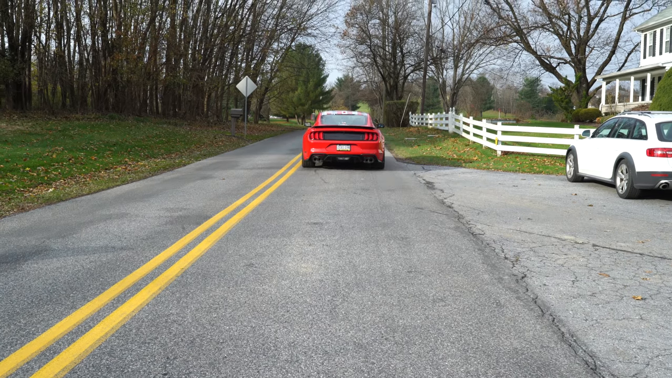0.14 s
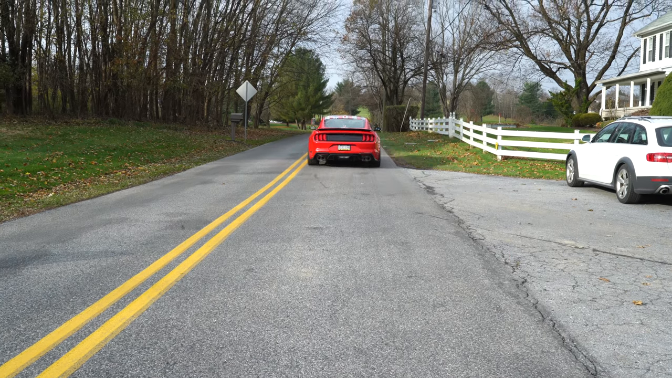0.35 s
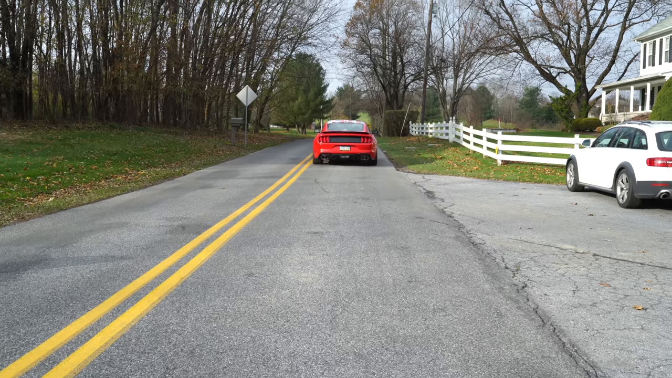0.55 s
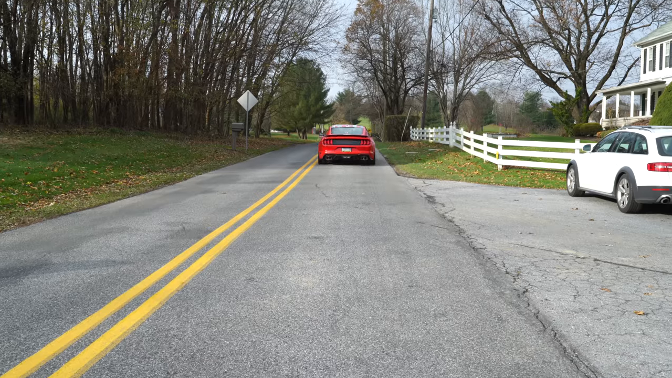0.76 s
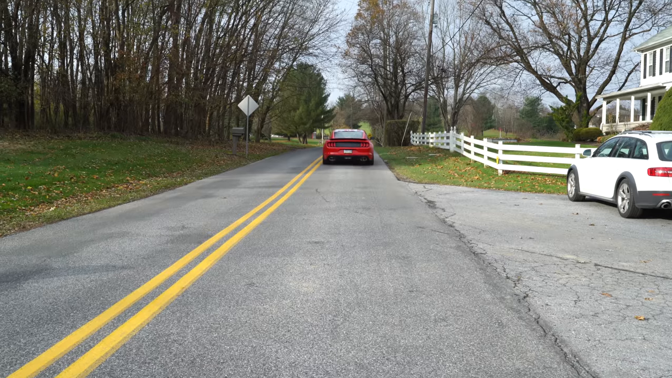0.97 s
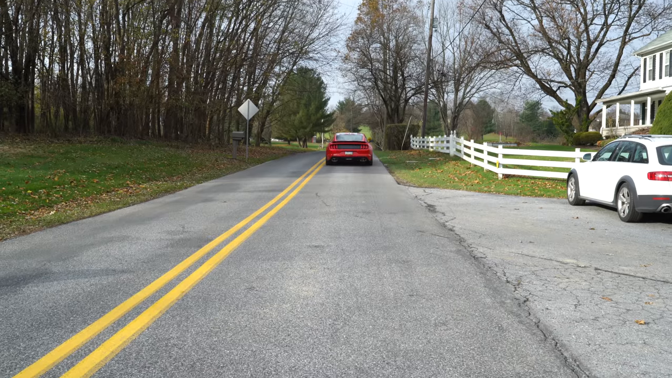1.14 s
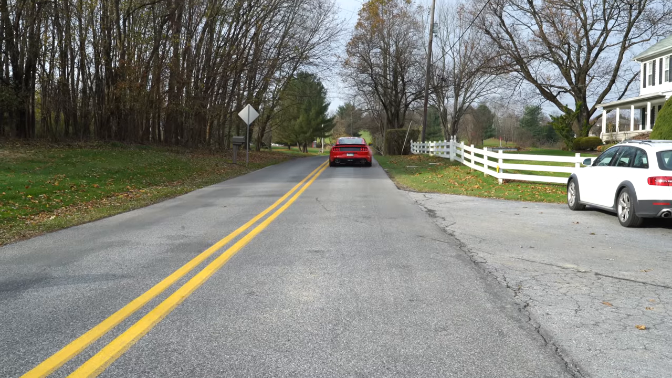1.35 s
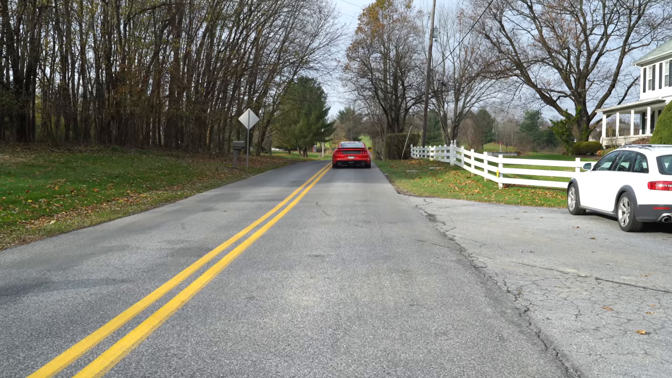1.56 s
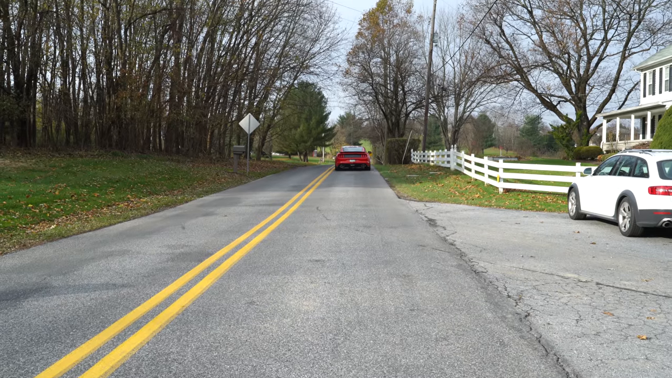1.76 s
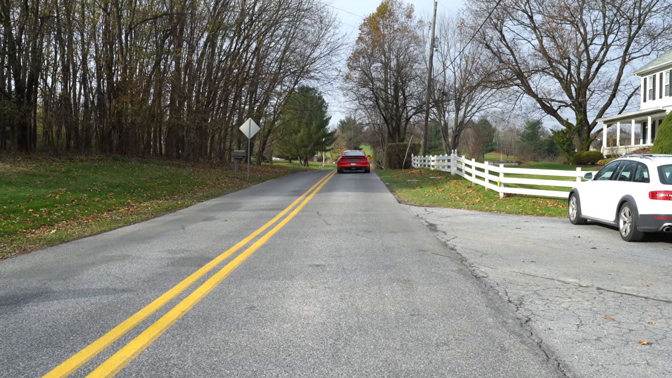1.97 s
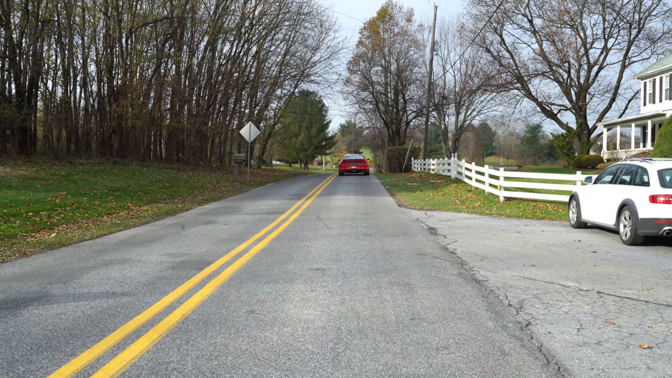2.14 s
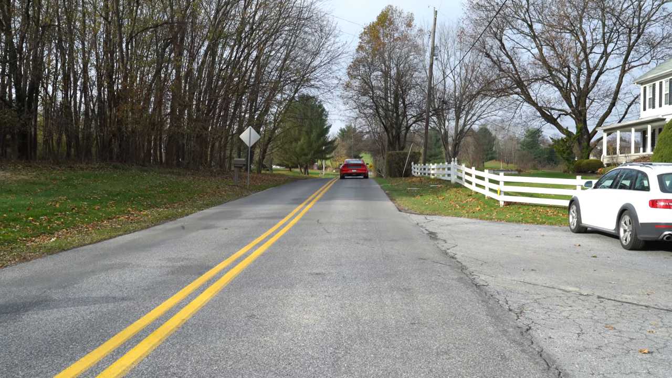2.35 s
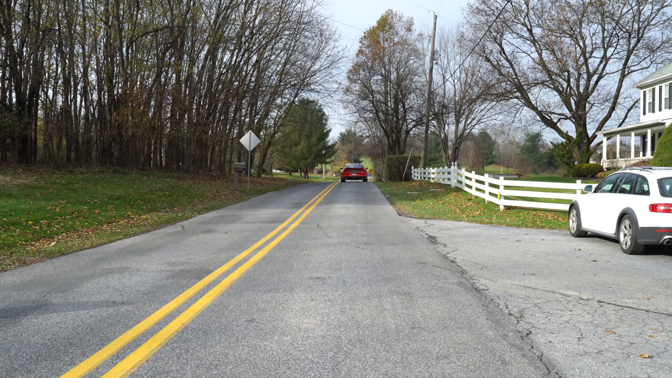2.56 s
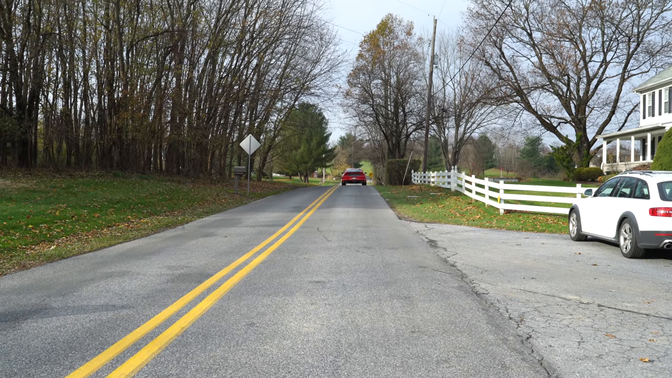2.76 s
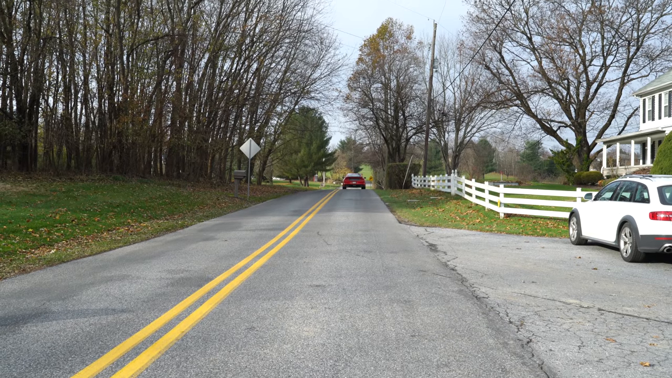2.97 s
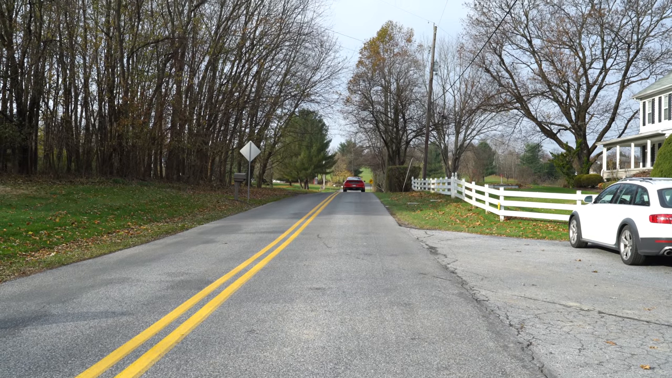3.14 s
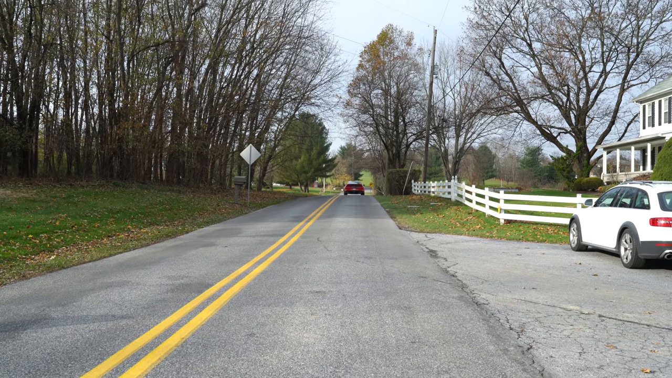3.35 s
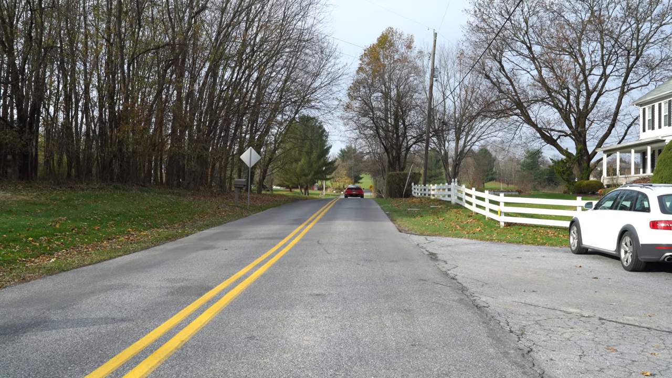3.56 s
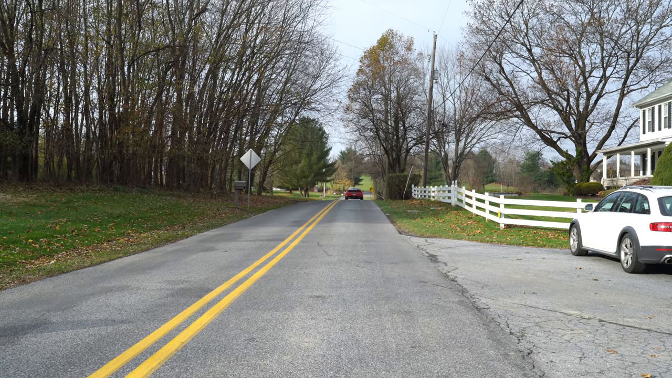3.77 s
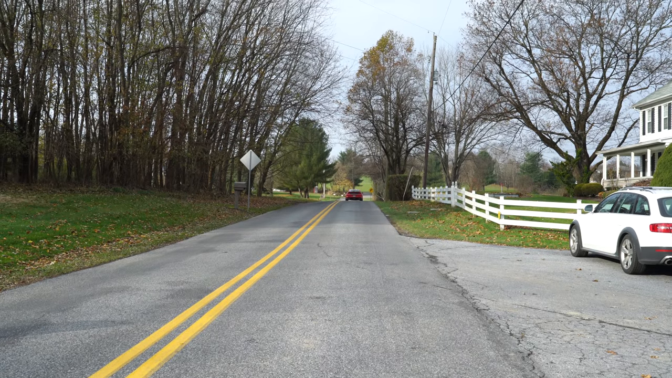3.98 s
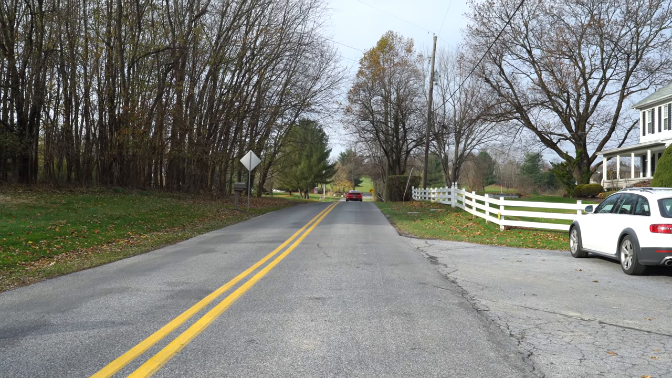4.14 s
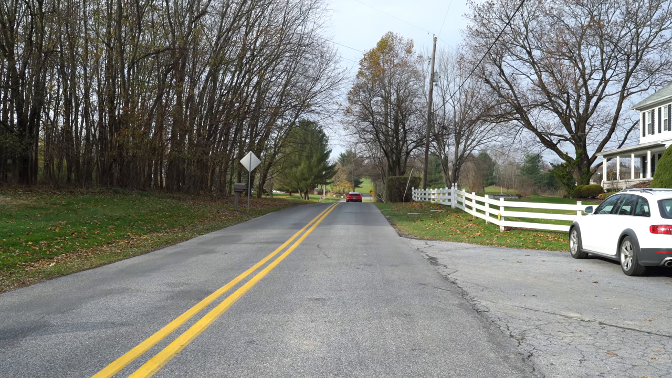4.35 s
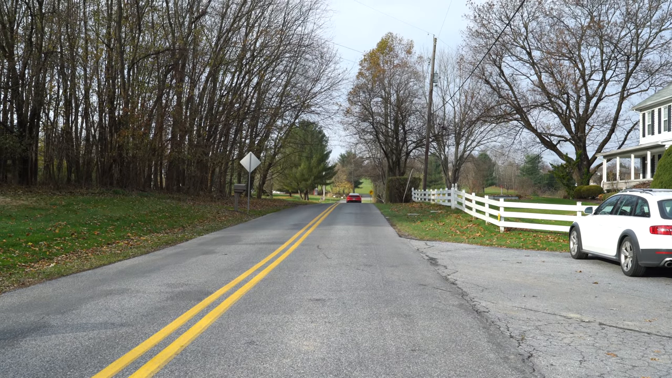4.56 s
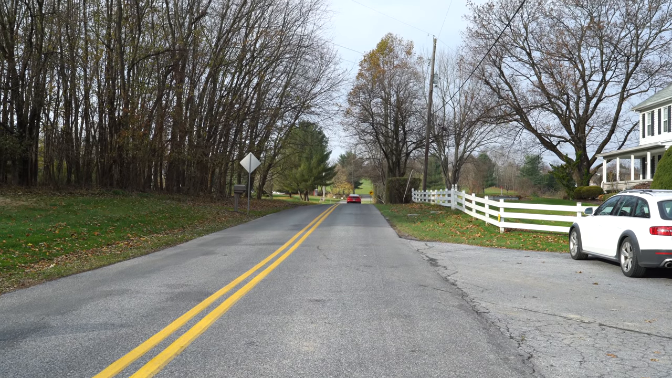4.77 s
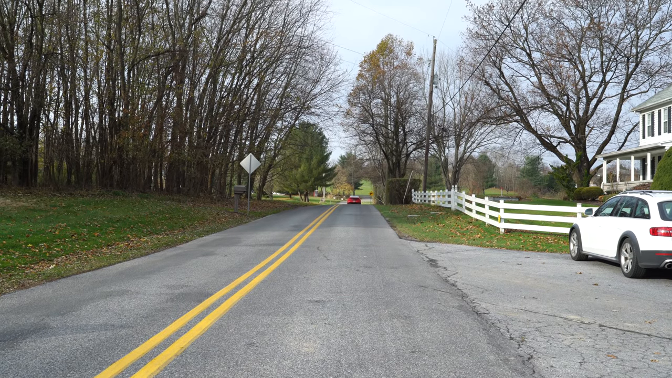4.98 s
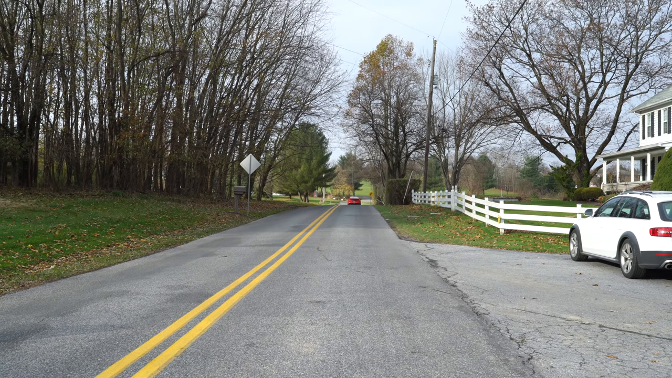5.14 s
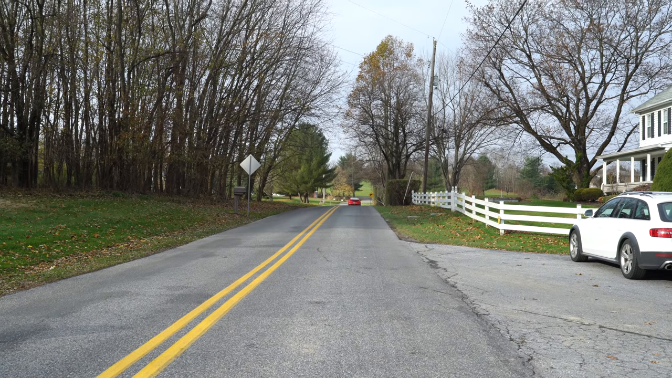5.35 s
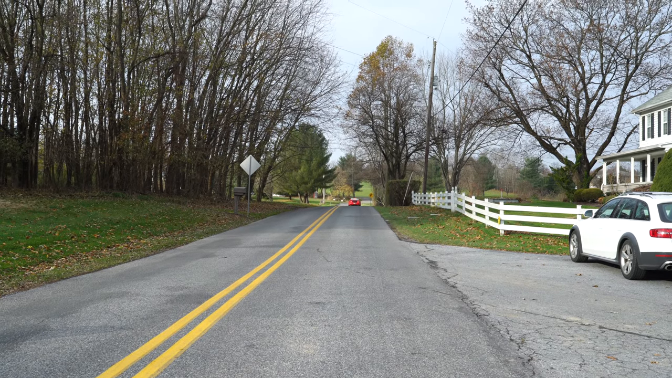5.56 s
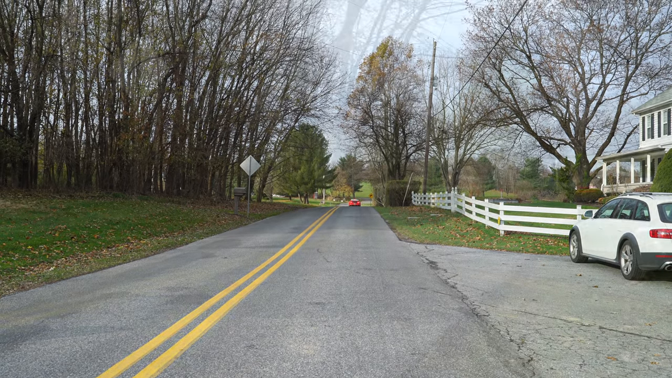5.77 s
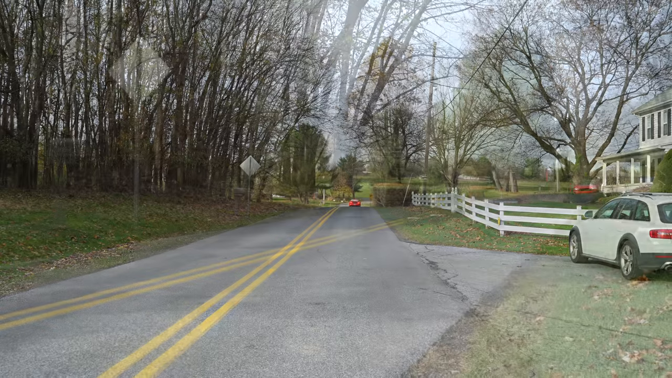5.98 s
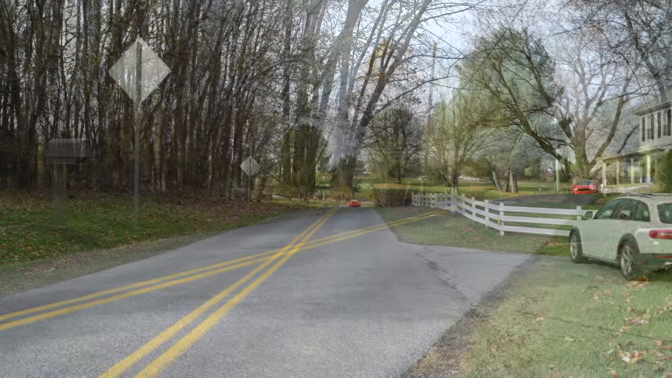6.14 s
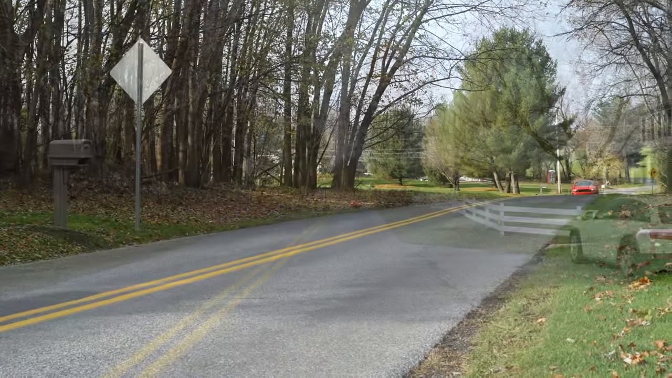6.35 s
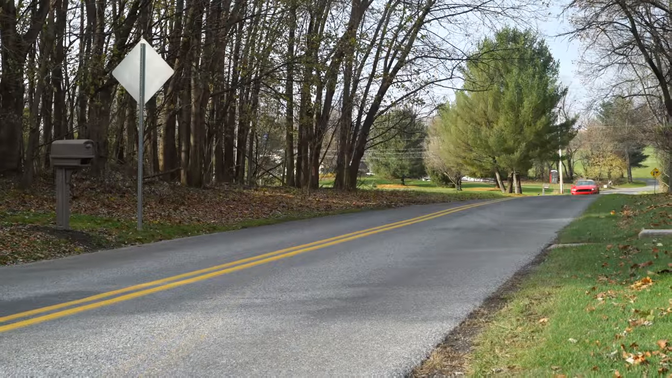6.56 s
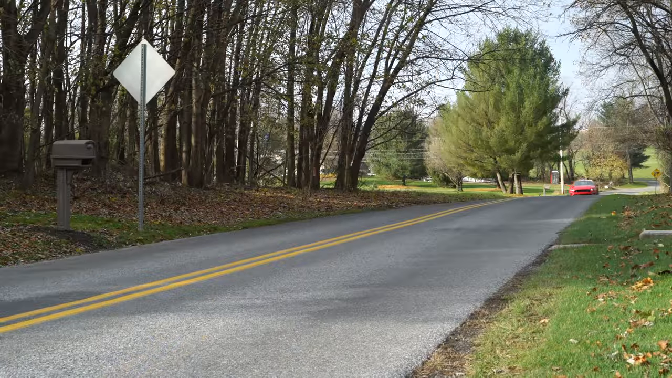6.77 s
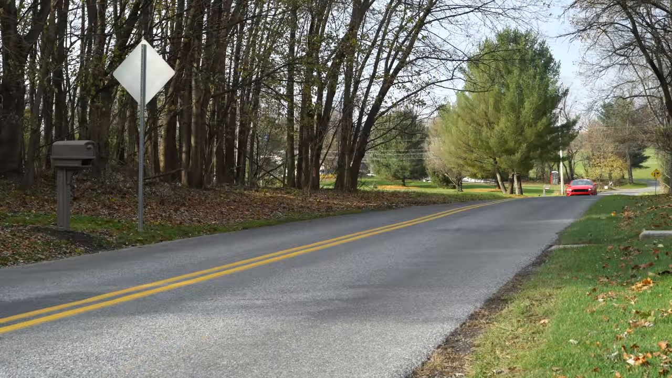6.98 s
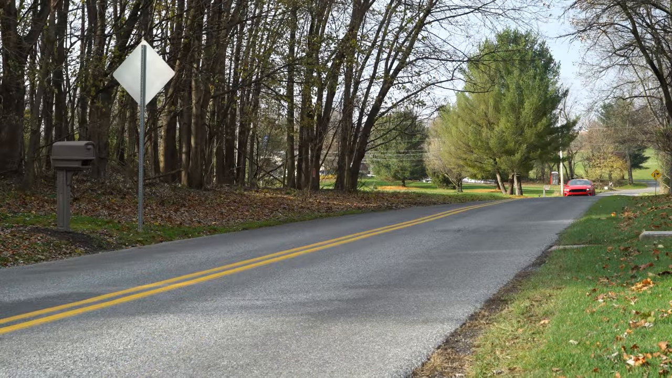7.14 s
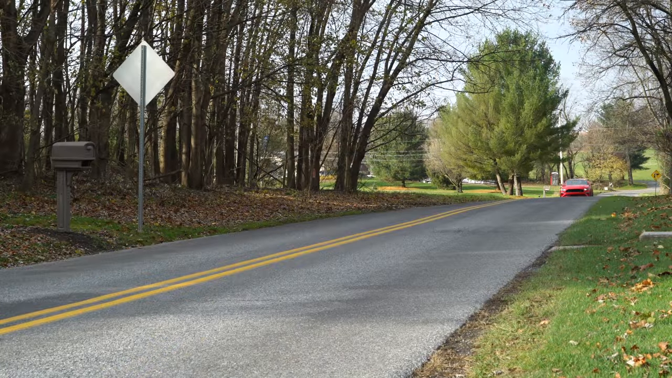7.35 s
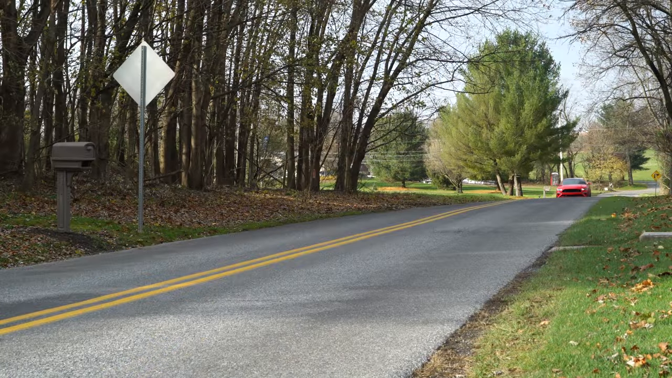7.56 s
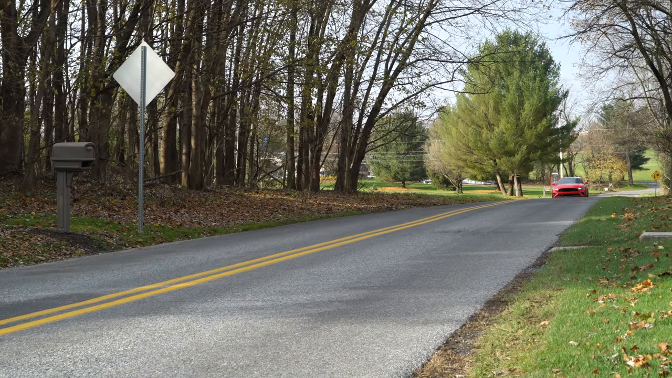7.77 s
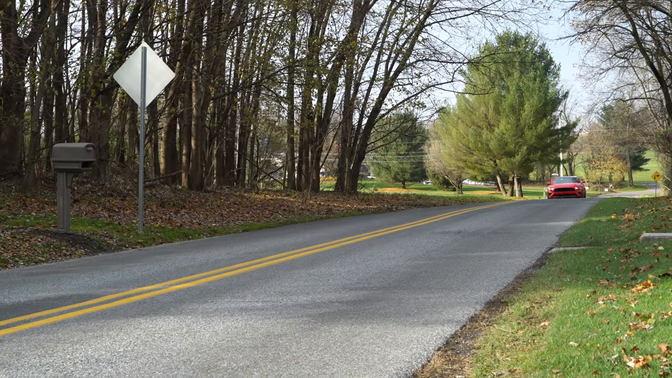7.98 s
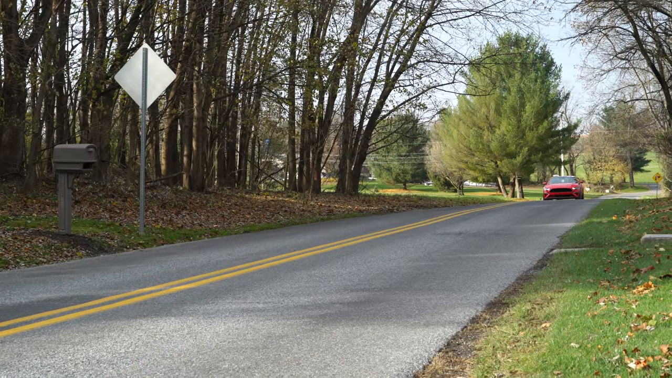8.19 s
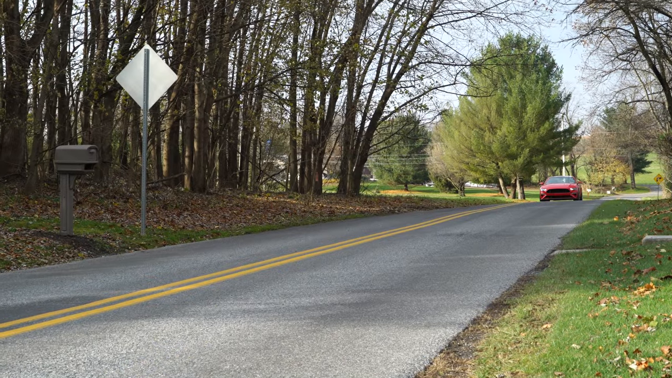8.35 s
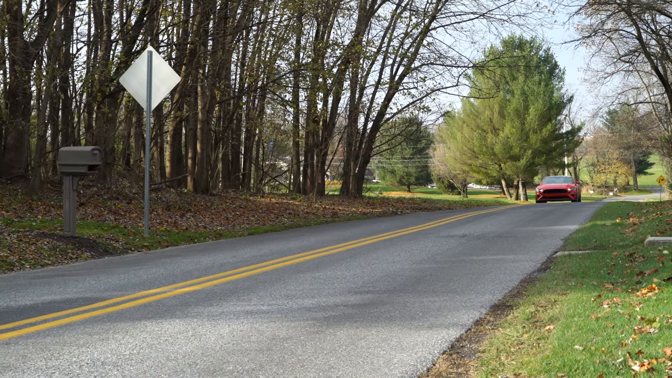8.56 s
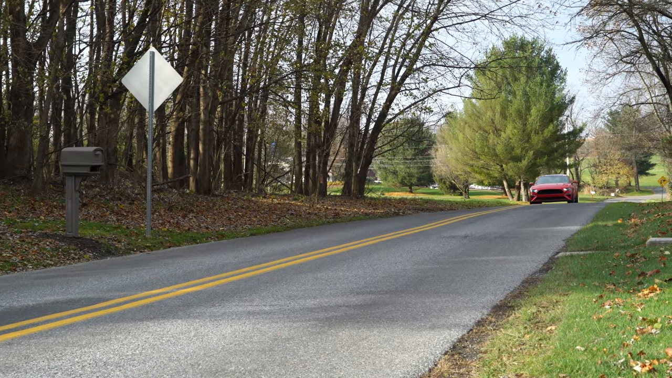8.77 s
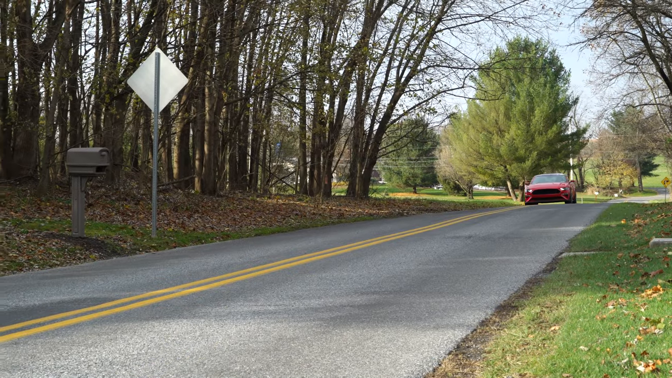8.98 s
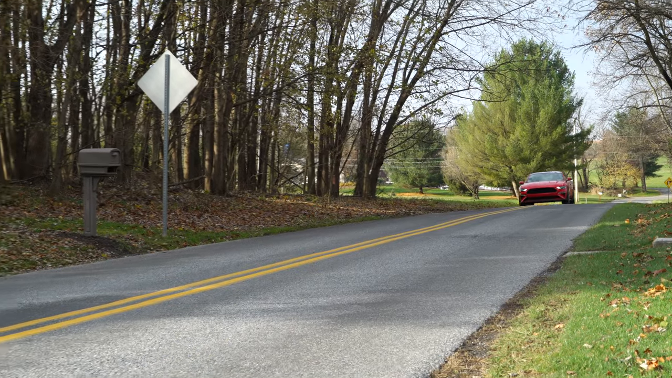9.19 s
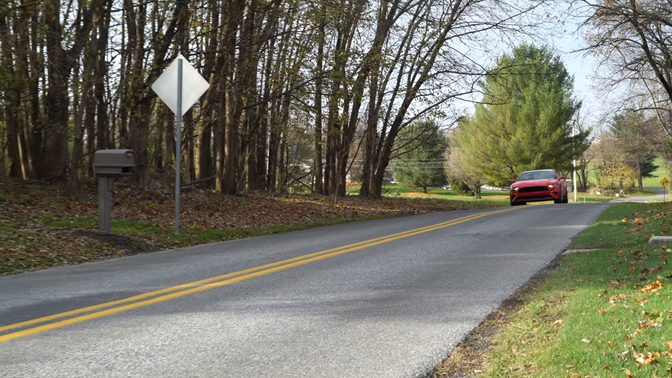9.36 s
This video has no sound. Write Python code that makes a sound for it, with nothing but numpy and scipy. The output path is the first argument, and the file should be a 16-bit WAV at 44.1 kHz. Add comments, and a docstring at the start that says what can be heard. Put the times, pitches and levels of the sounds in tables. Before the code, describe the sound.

A V8 sports car accelerates away from a fixed roadside microphone, loud enough to flatten the peaks at first. Two raspy pulls are split by a short popping lift; then come backfires, lumpy burble and a thin receding hum. Trees and fence return faint echoes. After a crossfade the car comes nearer, droning with rising pitch, low rumble and brightening tyre hiss over quiet country air and tiny squeaks.

```python
"""Country road by woods: a V8 car pulls hard away, shifts, pulls again, lifts off with pops and burble, cruises.
From about 6 s the car is heard from the front, droning closer with growing tyre noise.
Firing pulses drive the exhaust: filtered for boom and bark, steepened into shock fronts for rasp.
Pops are spikes and short noise bursts; rumble, tyres and air are coloured noise; squeaks are sines.
Roadside reflections and a scattered echo answer; the microphone flattens loud peaks."""
import sys
import numpy as np
from scipy import signal
from scipy.fft import rfft, irfft, next_fast_len
from scipy.io import wavfile
from scipy.ndimage import uniform_filter1d, map_coordinates

SR = 44100
rng = np.random.default_rng(int(sys.argv[2]) if len(sys.argv) > 2 else 0)


def unload_audio(sound):
    """Save the sound as a 16-bit wav file, at the path given as the first command line argument."""
    columns = np.transpose(np.atleast_2d(sound))
    # keep every value between -1 and 1, then stretch to whole-number steps
    steps = np.round(np.clip(columns, -1, 1) * 32767)
    wavfile.write(sys.argv[1], SR, steps.astype(np.int16))


N = 415422
TIME = np.arange(N) / SR

# relative colour of the exhaust's shock fronts and hiss: freq_hz, gain_db
RASP_COLOUR = [(1120, 8.5), (1900, -2.5), (2250, -17), (2700, -10.5), (3100, -15), (3600, -13), (4200, -19),
               (5100, -21.5), (5980, -27), (6710, -27), (15600, -41.5)]


def amp(db):
    """Decibels to gain."""
    return 10 ** (np.asarray(db) / 20)


def unit(x):
    """Scale to rms 1."""
    return x / np.sqrt(np.mean(x ** 2) + 1e-20)


def steady(x):
    """Hold the running rms near 1."""
    power = uniform_filter1d(uniform_filter1d(x * x, size=5000), size=3000)
    return x / np.sqrt(np.abs(power) + 1e-14)


def along(points, hz):
    """(Hz, value) points read on a log frequency axis."""
    point_hz, values = np.transpose(points)
    return np.interp(np.log(hz + 1), np.log(point_hz + 1), values)


def curves(rows):
    """One value per sample for each column after the time."""
    time_s, *columns = np.transpose(rows)
    return [np.interp(TIME, time_s, column) for column in columns]


def wobble(knots_per_s):
    """Smooth random curve through normally distributed knots."""
    knots = rng.standard_normal(int(N * knots_per_s / SR) + 4)
    coarse_s = TIME[::16]
    return np.interp(TIME, coarse_s, map_coordinates(knots, [coarse_s * knots_per_s]))


def ramp(start_s, end_s):
    """Rise from 0 to 1 between two times."""
    return np.clip((TIME - start_s) / (end_s - start_s), 0, 1)


def bump_at(centre_s, half_length_s):
    """Gaussian hump of height 1, down to 1/e at the half length."""
    return np.exp(-((TIME - centre_s) / half_length_s) ** 2)


def dying(times_s, decay_s):
    """Jump by 1 at each time, then decay exponentially."""
    return sum((TIME > s) * np.exp(-np.abs(TIME - s) / decay_s) for s in times_s)


def coloured(x, points, size=8192):
    """Minimum-phase filter with the gain of the (Hz, dB) points, built by folding the cepstrum."""
    cepstrum = irfft(np.log(amp(along(points, np.fft.rfftfreq(size, 1 / SR)))))
    cepstrum[1:size // 2] *= 2
    cepstrum[size // 2 + 1:] = 0
    response = irfft(np.exp(rfft(cepstrum)))[:size // 2]
    return signal.oaconvolve(x, response)[:N]


def band(x, hz, kind, order=3):
    """Zero-phase Butterworth filter: the pulses stay in step."""
    return signal.sosfiltfilt(signal.butter(order, hz, kind, fs=SR, output="sos"), x)


def noise(points):
    """Coloured noise of rms 1."""
    return unit(coloured(rng.standard_normal(N), points))


def impulses(times_s, sizes):
    """Impulses placed between samples by linear sharing."""
    at = np.clip(times_s * SR, 0, N - 2)
    i = at.astype(int)
    early = np.bincount(i, sizes * (1 - at + i), N)
    late = np.bincount(i + 1, sizes * (at - i), N)
    return early + late


def puffs(kicks, decay_s):
    """Each impulse starts a decaying burst of turbulence; its energy does not depend on the decay time."""
    keep = np.exp(-1 / (decay_s * SR))
    envelope = signal.lfilter([np.sqrt(1 - keep ** 2)], [1, -keep], kicks)
    return envelope * rng.standard_normal(N)


def firings(cycles_per_s, cylinders, roughness):
    """Pulse times, edge sizes and both gas flows; unequal pipe runs give the V8 its lope."""
    jitter_ms, scatter_db, turbulence = roughness
    count = np.cumsum(cycles_per_s) / SR * len(cylinders)
    k = np.arange(1, int(count[-1]))
    size_db, late_ms, *edge_db = np.array(cylinders)[k % len(cylinders)].T
    timing_chance, size_chance = rng.standard_normal((len(k), 2)).T
    times_s = np.interp(k, count, TIME) + (late_ms + jitter_ms * timing_chance) / 1000
    sizes_db = np.array([size_db, edge_db[0] if edge_db else size_db])
    sizes, edges = amp(sizes_db + scatter_db * size_chance)
    kicks = [impulses(times_s, each) for each in (sizes, edges)]
    flows = [kick + turbulence * puffs(kick, decay_s=.083) for kick in kicks]
    return times_s, edges, flows


def tailpipe(effort, levels, cylinders, pipe, roughness, fronts):
    """Exhaust from behind: pulses boom, edges bark and steepen into rasp, each following revs and effort."""
    # engine speed, eight firings per cycle: time_s, cycles_per_s
    away_speed = [(0, 25.1), (.35, 29.4), (.6, 32.73), (.85, 35.86), (1.1, 38.93), (1.37, 41.5),
                  (1.45, 39.5), (1.6, 38.08), (1.75, 36.4), (1.9, 34.45), (2.07, 32.8), (2.27, 32.55),
                  (2.4, 31.17), (2.53, 28.9), (2.62, 30.1), (2.74, 31.75), (2.88, 31.55), (3.08, 33.1),
                  (3.3, 33.95), (3.45, 34.87), (3.72, 33.83), (3.85, 32.24), (4.3, 28.46), (4.55, 26.22),
                  (4.8, 22.5), (5, 23.25), (5.25, 22.92), (6.4, 21.85)]
    # a shock and its returns in the tailpipe: delay_ms, level_db
    shock_bounces = [(0, -4), (1.15, -13.5), (2.702, -11.5)]
    reference_cycles_per_s, flywheel_s = 33, .07
    throttle_powers = (.56, .78, 1.7)  # boom, bark, rasp: the treble follows effort most steeply
    boom_top_hz, bark_top_hz = 706, 1876
    rasp_top_hz, rasp_top_power = 4180, 2.5  # rasp above this needs a wide-open throttle
    jet_share = .38  # steady rush of gas relative to shock rms

    # the flywheel rounds every change of speed
    speed = uniform_filter1d(curves(away_speed)[0], size=round(flywheel_s * SR))
    octaves = np.log2(speed / reference_cycles_per_s)
    boom_gain, bark_gain, rasp_gain = [
        amp(level_db + slope_db * octaves) * effort ** power
        for (level_db, slope_db), power in zip(levels, throttle_powers)]
    times_s, edges, (flow, edge_flow) = firings(speed, cylinders, roughness)
    boom = band(coloured(flow, pipe), boom_top_hz, "low", order=4)
    bark = band(coloured(edge_flow, pipe), boom_top_hz, "high", order=4)
    bark = band(bark, bark_top_hz, "low", order=4)

    # each shock bounces back and forth in the tailpipe and trails a short hiss
    steepness, scatter_db, hiss_share = fronts
    heights = edges ** steepness * amp(scatter_db * rng.standard_normal(len(times_s)))
    shocks = sum(impulses(times_s + ms / 1000, heights * amp(db)) for ms, db in shock_bounces)
    jet = jet_share * np.std(shocks) * rng.standard_normal(N)
    hiss = hiss_share * puffs(impulses(times_s, heights), decay_s=.004)
    crackle = shocks + hiss + jet
    rasp = steady(band(coloured(crackle, RASP_COLOUR), bark_top_hz, "high", order=4))

    # air takes the top off the rasp as the car draws away
    near = bump_at(0, 1.83)
    rasp = near * rasp + (1 - near) * band(rasp, 5100, "low", order=1)
    dull = band(rasp, rasp_top_hz, "low", order=2)
    rasp = dull + np.minimum(effort, 1) ** rasp_top_power * (rasp - dull)
    return boom_gain * steady(boom) + bark_gain * steady(bark) + rasp_gain * rasp


def throttle(opens_s, rise_s, shuts_s, fall_s):
    """Effort of one pull, nominally 0-1: builds, holds with brief eases or surges, dies away."""
    # momentary changes: centre_s, half_length_s, change_db
    eases = [(1.073, 0.12, -0.5), (2.553, 0.056, -1.5), (3.535, .06, 1)]
    attack = (1 - np.exp(-np.maximum(TIME - opens_s, 0) / rise_s)) ** 2
    release = np.exp(-(np.maximum(TIME - shuts_s, 0) / fall_s) ** 2)
    eased_db = sum(db * bump_at(s, half_s) for s, half_s, db in eases)
    return attack * release * amp(eased_db)


def leaving():
    """Two full-throttle pulls, coasting between and after, then an even cruise; distance thins it all as 1/r."""
    # full throttle: opens_s, rise_s, shuts_s, fall_s
    pulls = [(-.15, 0.15, 1.412, 0.026), (2.003, 0.048, 3.679, 0.079)]
    # car driving off: time_s, distance_m
    away_distance = [(0, 8.1), (1, 25.8), (3, 53.7), (6.5, 87)]
    # boom, bark, rasp at 30 m, 33 cycles/s, effort 1: level_db, slope_db_per_octave of engine speed
    first_levels = [(-21, 5), (-27, 13), (-39, 11)]
    second_levels = [(-18.5, -9), (-24, -2.5), (-35, 7.5)]
    coast_levels = [(-31, 0.63), (-44.5, 25.5), (-64, 34)]
    cruise_levels = [(-31.5, 0.0076), (-55, 0.002), (-82, 0)]
    # cylinders in firing order: size_db, late_ms, edge_db (steep edge at full throttle)
    first_pulses = [(3.5, -0.32, -10), (1.5, 0.3, -5), (-4, -0.79, -2.5), (-0.7, 1.16, -0.5),
                    (3.5, -0.27, -6.5), (6.5, -0.26, -2.5), (4.5, 0.38, -3), (2, 0.18, 6)]
    second_pulses = [(1, 0.46, -7), (-0.5, 0.02, -2.5), (0.5, 0.32, -3.5), (0.5, 0.82, 0), (5, -0.48, -1),
                     (3.9, -0.61, -4), (1.1, -0.022, -3), (-0.2, -0.14, 7)]
    # cylinders in firing order: size_db, late_ms
    coast_pulses = [(7, 1.01), (-2.5, -.22), (-5, -.2), (2.7, -.59), (0, .7), (.5, .03), (-2, -.76),
                    (-1.5, -.33)]
    cruise_pulses = [(0.4, -.49), (2.1, -.49), (5, -0.31), (-0.8, -0.33), (0.5, 1.3), (-8, .47),
                     (-.1, 0.0031), (6.5, -0.26)]
    # relative colour of the pipes: freq_hz, gain_db
    first_pipe = [(25, -28), (70, -12), (120, -11.5), (200, -5), (280, -5.5), (330, -2.2), (390, -1),
                  (455, 0.0), (515, -8.5), (575, -5.5), (700, -13), (820, -16), (904, -13), (1000, -18),
                  (1108, -12), (1170, -22), (1250, -18), (1380, -22.5), (1520, -27), (1760, -25.5),
                  (2100, -34.5), (5000, -56.5)]
    second_pipe = [(25, -39.5), (70, -18), (120, -16.5), (200, -11), (280, -7.5), (330, -1), (390, -4),
                   (455, -2.6), (515, -9), (575, -3.5), (700, -19.5), (820, -13.5), (904, -11.5),
                   (1000, -12.5), (1108, -13), (1170, -19.5), (1250, -12.5), (1380, -24), (1520, -26),
                   (1760, -19.5), (2100, -45), (5000, -64)]
    coast_pipe = [(25, -27.5), (65, -16), (100, -16.5), (135, -5.5), (175, -13), (220, -1.5), (270, -1.5),
                  (325, -1.7), (380, -8.5), (425, 2.5), (480, -12.5), (550, -6.7), (605, -11.7),
                  (720, -20.5), (1100, -20), (1500, -35), (2100, -39), (5000, -62)]
    cruise_pipe = [(25, -37), (65, -20), (100, -15.5), (135, -8.5), (175, -28.5), (220, -10.5), (270, -4.5),
                   (325, 1), (380, -18), (425, -4.5), (480, -11.5), (550, -17), (605, -17), (720, -32.5),
                   (1100, -34.5), (1500, -41.5), (2100, -47), (5000, -77)]
    # firing unsteadiness: (jitter_ms, scatter_db, turbulence share)
    first_rough, second_rough = (.006, .25, .018), (.008, .3, .025)
    coast_rough, cruise_rough = (.02, .5, .045), (.008, .15, .012)
    # shock fronts: (power law of edge strength, scatter_db, hiss share)
    first_shocks, second_shocks, coast_shocks = (.85, 2.3, .9), (1.1, 2.4, 1), (.5, 2, 3)
    lull_s, lull_half_s, lull_db = 4.05, .045, -4.5  # the burble dips briefly
    afterhiss_db, afterhiss_decay_s = -43.5, .16
    reference_m = 30

    first, second = [throttle(*pull) for pull in pulls]
    out = tailpipe(first, first_levels, first_pulses, first_pipe, first_rough, first_shocks)
    out += tailpipe(second, second_levels, second_pulses, second_pipe, second_rough, second_shocks)
    shut_times_s = [pull[2] for pull in pulls]
    coast = (TIME > shut_times_s[0]) * np.clip(1 - first - second, 0, 1)

    # throttle shut: the mixture burns unevenly until the engine settles into a cruise
    burble = tailpipe(.97, coast_levels, coast_pulses, coast_pipe, coast_rough, coast_shocks)
    lumps = amp(1.2 * wobble(38) + lull_db * bump_at(lull_s, lull_half_s))
    settled = ramp(4.56, 4.76)
    out += coast * np.sqrt(1 - settled) * lumps * band(burble, 5000, "low", order=2)
    cruise = tailpipe(.94, cruise_levels, cruise_pulses, cruise_pipe, cruise_rough, coast_shocks)
    out += np.sqrt(settled) * cruise

    # gas keeps hissing out of the pipes after the throttle shuts
    hiss = unit(band(band(noise(RASP_COLOUR), 1400, "high"), 5000, "low", order=1))
    out += coast * amp(afterhiss_db) * dying(shut_times_s, afterhiss_decay_s) * hiss
    distance_m, = curves(away_distance)
    return out * reference_m / distance_m * (1 - ramp(5.5, 6.7))


def glances(x):
    """Single reflections; paths shift as the car moves, so engine orders swell and fade in turn."""
    # off fence, house and trunks: delay_ms, level_db
    reflections = [(6, -15), (13, -16), (22, -18)]
    drift_ms = .7
    dull = band(x, 2600, "low", order=2)
    out = 0
    for delay_ms, level_db in reflections:
        delay_s = (delay_ms + drift_ms * wobble(1.6)) / 1000
        out = out + amp(level_db) * np.interp(TIME - delay_s, TIME, dull)
    return out


def woods(x):
    """Scattered echo from tree trunks: decaying noise with its own t60 at each frequency."""
    # echo decay: freq_hz, t60_s
    decay = [(150, 0.18), (1000, 0.84), (4000, 0.015), (12000, 0.0064)]
    hz, t, z = signal.stft(rng.standard_normal(SR), SR, nperseg=256)
    fade = amp(-60 * t / along(decay, hz)[:, None])
    tail = signal.istft(z * fade, SR, nperseg=256)[1]
    delayed = np.pad(x, (700, 0))  # samples
    return signal.oaconvolve(delayed, tail / np.linalg.norm(tail))[:N]


def roadside():
    """Country air as steady coloured noise, a soft low bump, and faint squeaks of wavering sines."""
    # relative colour of the air: freq_hz, gain_db
    air = [(20, -22.5), (60, -1.5), (130, -9), (300, -0.5), (700, -9), (1100, -12.5), (2000, -26.5),
           (4000, -40), (6000, -53.5), (9000, -64.5), (15800, -60.5)]
    # thin squeaks: centre_s, half_length_s, pitch_hz, waver_knots_per_s, level_db
    chirps = [(8.29, .035, 9700, 1200, -74), (8.29, 0.038, 6540, 600, -74), (8.41, .03, 6550, 300, -73),
              (8.48, 0.041, 10200, 1800, -75), (8.66, 0.025, 10300, 450, -71),
              (8.66, .022, 11600, 600, -76), (8.89, .06, 11300, 2400, -75)]
    squeaks = sum(amp(db) * bump_at(s, half_s) * wobble(knots_per_s) * np.sin(2 * np.pi * hz * TIME)
                  for s, half_s, hz, knots_per_s, db in chirps)
    bump = amp(-35) * bump_at(5.915, .01) * np.sin(2 * np.pi * 78 * TIME)
    return amp(-51.5) * noise(air) + squeaks + bump


def pops():
    """Backfires: a pressure spike and short roar through the pipes; the biggest steepen into a crack."""
    # unburnt fuel firing in the pipes, relative levels: time_s, spike_db, roar_db
    backfires = [(1.476, -10, -17), (1.5, -28, -24), (1.7, -29, -37), (1.726, -20, -32), (1.752, -27, -36),
                 (1.894, -14, -23), (1.906, -24, -31), (1.945, -25, -31), (3.83, -30, -35),
                 (3.858, -22, -33), (3.890, -14, -25), (3.904, -15, -34), (3.94, -9, -27),
                 (4.119, -21, -30), (4.127, -22, -31), (4.199, -24, -37), (4.245, -31, -40),
                 (4.275, -28, -41), (4.307, -31, -41)]
    # colour of spike and roar: freq_hz, gain_db
    pop_colour = [(50, -19.5), (150, -16.5), (320, 7), (380, -3), (450, 0), (580, -7.5), (700, -8),
                  (1100, -7.5), (1600, -25), (3000, -43.5), (5000, -67), (9000, -87.5), (16000, -82.5)]
    times_s, spike_db, roar_db = np.transpose(backfires)
    spikes = impulses(times_s, amp(spike_db + 28))
    roar = puffs(impulses(times_s, amp(roar_db + 42)), decay_s=.012)
    fronts = impulses(times_s, amp(3 * spike_db + 35))  # tripled dB: the crack favours big pops
    crack = fronts + 2.6 * puffs(fronts, decay_s=.012)
    crack = band(band(crack, 1500, "high", order=1), 1660, "low", order=2)
    return coloured(spikes + roar, pop_colour) + crack


def snaps():
    """Hardest shock fronts of the second pull: single impulses with the colour of the rasp."""
    # time_s, peak_db
    hard_fronts = [(2.107, -33.5), (2.133, -32), (2.258, -28.5), (2.432, -21), (2.464, -17.5),
                   (3.205, -32.5), (3.515, -26)]
    times_s, peak_db = np.transpose(hard_fronts)
    fronts = band(coloured(impulses(times_s, amp(peak_db)), RASP_COLOUR), 1700, "high")
    return amp(peak_db.max()) * fronts / np.abs(fronts).max()


def returning():
    """From the front the body hides the rasp: engine orders sweep pipe resonances over rumble and tyres."""
    # engine speed: time_s, cycles_per_s
    back_speed = [(5.9, 18.4), (6.3, 18.9), (7.05, 19.93), (8.05, 21.6), (9.42, 23.78)]
    # cylinders in firing order: size_db, late_ms
    front_pulses = [(-2.6, 0.09), (4.5, 0.22), (-1.2, -0.33), (3.5, -0.021), (-2.3, 0.15), (-3.5, 0.44),
                    (-0.5, 0.071), (1.5, -0.77)]
    # relative colours of exhaust, rumble and tyres: freq_hz, gain_db
    front_pipe = [(30, -45), (75, -11), (110, -5.5), (160, 1.5), (205, -2.5), (260, -5.5), (315, 1),
                  (345, -7.5), (378, -4.5), (410, -11), (445, -6.5), (480, -16.5), (520, -5.5), (570, -25),
                  (700, -27.5), (950, -34.5), (2000, -48.5), (5000, -81.5)]
    rumble_colour = [(20, -20.5), (45, -19.5), (72, 3), (110, -8), (250, -5), (500, -22), (900, -65.5)]
    tyre_colour = [(320, -47), (550, -3.5), (574, -4.5), (669, -3.5), (886, -5.5), (1640, -14.5),
                   (2170, -22), (4020, -32.5), (5870, -50.5), (15600, -78.5)]
    front_rough = (.025, .4, .05)  # jitter_ms, scatter_db, turbulence share
    fade_in_s = (5.744, 6.51)
    start_m, approach_m_per_s, nearest_m = 109, 17.26, 10
    # exhaust, rumble, tyres: (level_db at the start distance, gain_db per halving of distance)
    growth = [(-31, 7.5), (-39, 5.1), (-53, 14.64)]
    light_load_db, throttle_opens_s = -15.5, (6.03, 6.6)
    swell_hz, swell_s, swell_db = (320, 438), (9.13, 9.25), 6.5
    road_hz, road_s, road_db, road_waver_db = (900, 2000), (7.9, 8.5), -11, 4

    speed, = curves(back_speed)
    distance_m = np.maximum(start_m - approach_m_per_s * (TIME - fade_in_s[0]), nearest_m)
    halvings = np.log2(start_m / distance_m)
    exhaust_db, rumble_db, tyre_db = [db + gain_db * halvings for db, gain_db in growth]
    load = amp(light_load_db * (1 - ramp(*throttle_opens_s)))
    flow = firings(speed, front_pulses, front_rough)[2][0]
    exhaust = amp(exhaust_db + .45 * wobble(8.2)) * steady(coloured(flow, front_pipe))
    # the upper drone swells as the car comes close
    exhaust += (amp(swell_db * ramp(*swell_s)) - 1) * band(exhaust, swell_hz, "bandpass", order=2)
    rumble = amp(rumble_db + .53 * wobble(3.2)) * noise(rumble_colour)
    tyres = amp(tyre_db + .6 * wobble(14) + .7 * wobble(4)) * noise(tyre_colour)
    # close up the road roar brightens and wavers
    road_gain = amp(road_db + road_waver_db * wobble(6)) * ramp(*road_s)
    tyres += road_gain * band(tyres, road_hz, "bandpass", order=2)
    return ramp(*fade_in_s) * (load * exhaust + rumble + tyres)


def scene():
    """The car, its reflections and echo, and the roadside."""
    echo_db = -22
    car = leaving() + pops() + snaps() + returning()
    return (car + glances(car) + amp(echo_db) * woods(car) + roadside())[None]


def record(dry):
    """Microphone: flattens loud peaks a little unevenly, rolls off the deepest bass, cuts the top."""
    bottom_hz, top_hz = 7.7, 15800
    limit = np.where(dry > 0, .32, .28)
    clipped = dry / (1 + np.abs(dry / limit) ** 6) ** (1 / 6)
    size = next_fast_len(N + SR // 2)
    hz = np.fft.rfftfreq(size, 1 / SR)
    passband = hz ** 2 / (hz ** 2 + bottom_hz ** 2) * (hz < top_hz)
    return irfft(rfft(clipped, size) * passband, size)[..., :N]


dry = scene()
out = record(dry)
unload_audio(out)
```